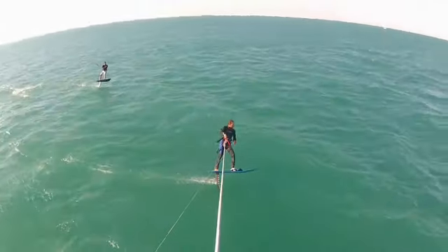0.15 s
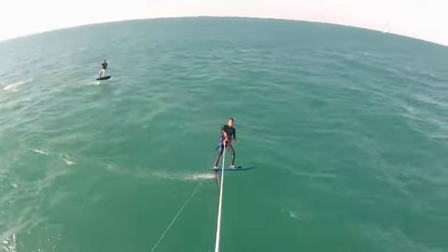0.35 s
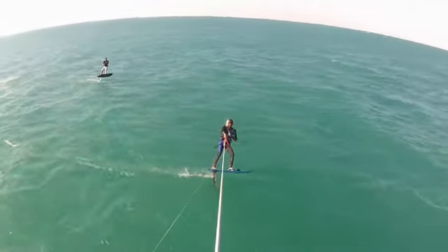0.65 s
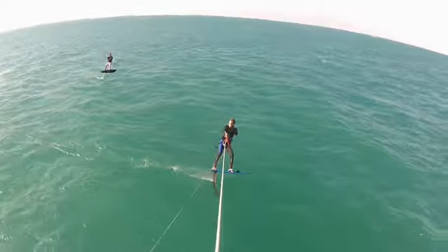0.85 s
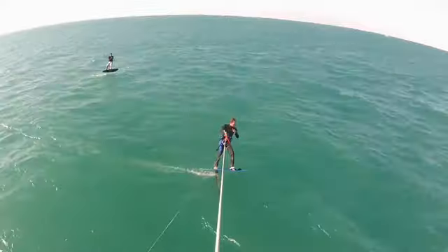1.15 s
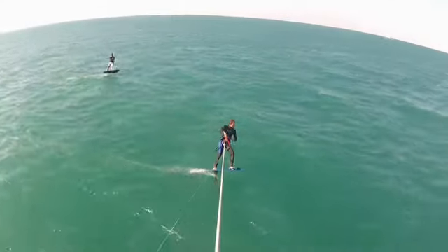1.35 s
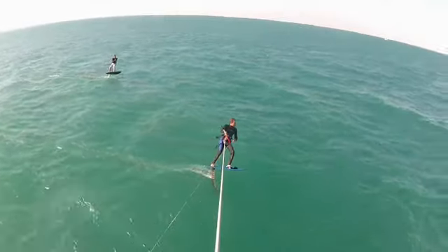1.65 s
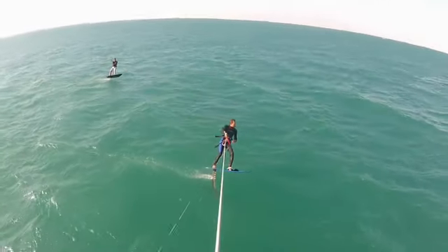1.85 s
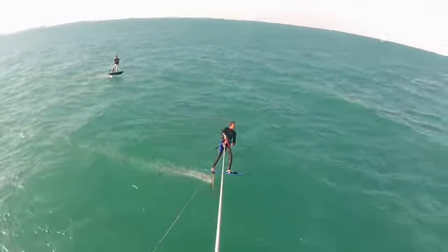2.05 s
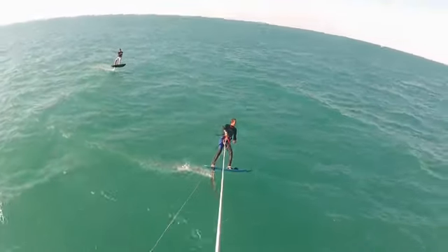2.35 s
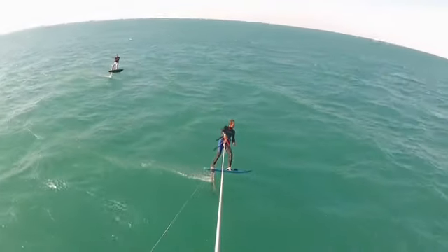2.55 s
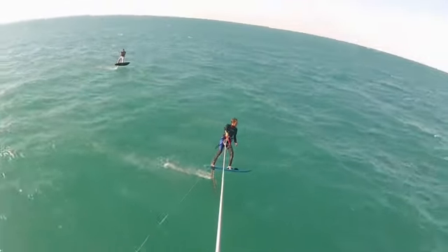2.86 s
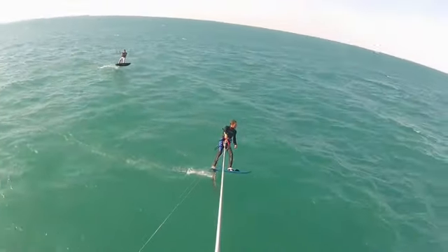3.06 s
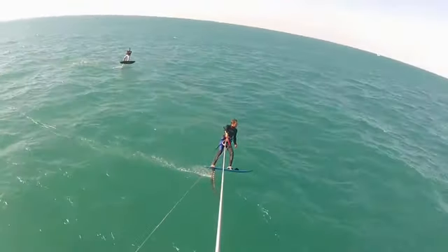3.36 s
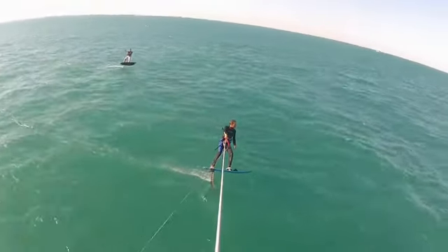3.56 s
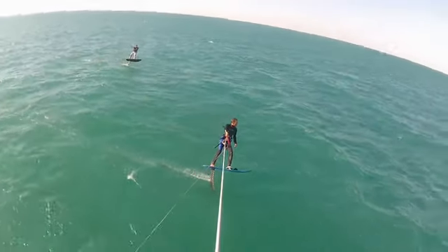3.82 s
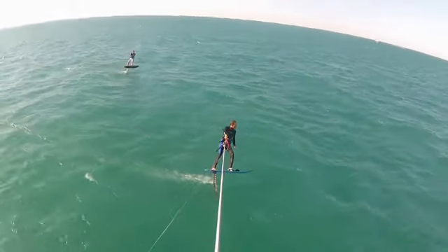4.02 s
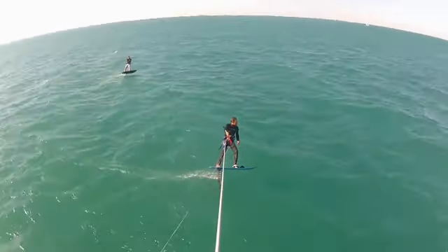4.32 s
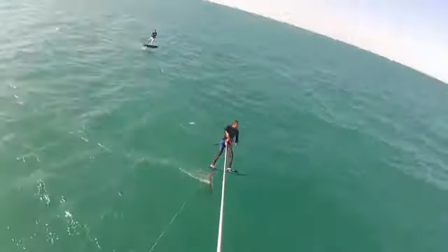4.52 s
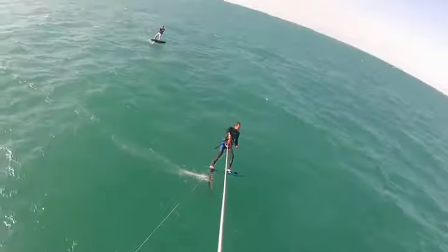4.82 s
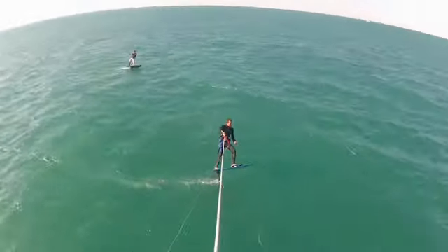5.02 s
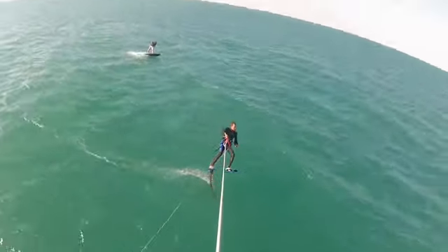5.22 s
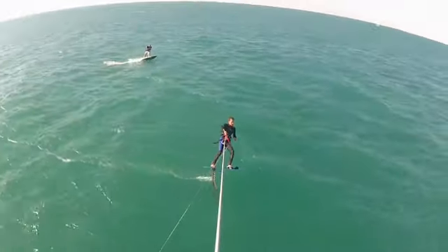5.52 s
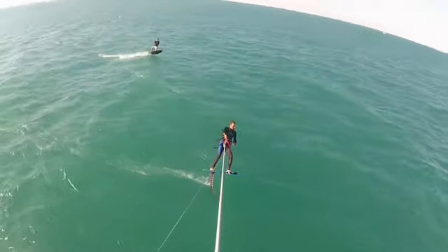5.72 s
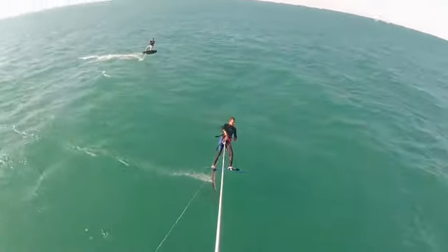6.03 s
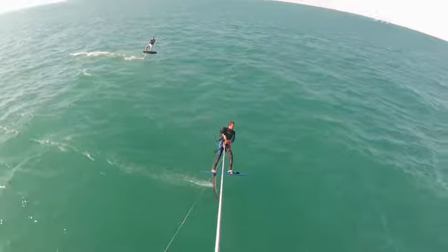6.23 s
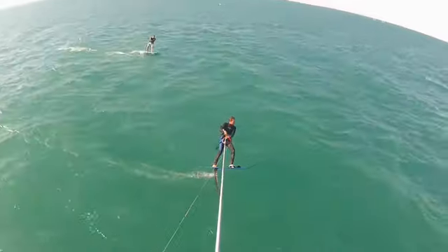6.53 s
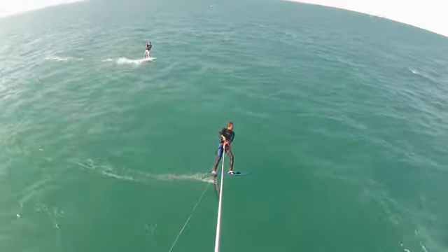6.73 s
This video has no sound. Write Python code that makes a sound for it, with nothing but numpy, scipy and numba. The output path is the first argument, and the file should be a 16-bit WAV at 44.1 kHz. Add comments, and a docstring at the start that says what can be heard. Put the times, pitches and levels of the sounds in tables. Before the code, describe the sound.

Close on a small housed camera hanging from kite lines over open sea, a loud, breathy whistle near 1.4 kilohertz wavers throughout with abrupt swells. Two knocks come early over a short gust, then lighter wind and faint taps. Near 4.5 seconds air rushes, wind thuds low, and the housing cracks hard on its mount; the whistle then continues with more knocks. Gritty, low-rate sound, one channel.

```python
"""A small camera in a closed housing hangs on taut kite lines over open sea.
From the start, vortices shed by two lines whistle with sharp swells, over an opening gust and two early knocks.
The whistle keeps wavering over lighter wind and knocks; near 4.5 s the camera swings: the lower line falls
silent, air rushes past an edge, wind thuds on the port, and the housing knocks hardest on its mount.
From 5.2 s the lower line sounds again. A recorder holding samples at a low rate adds mirror tones throughout."""
import sys
import numpy as np
from scipy import signal
from scipy.io import wavfile
from numba import njit

SR = 44100
rng = np.random.default_rng(int(sys.argv[2]) if len(sys.argv) > 2 else 0)


def dump(signal):
    """Clip the signal to [-1, 1] and save it as 16-bit WAV at the path in sys.argv[1]."""
    limited = np.clip(np.atleast_2d(signal).T, -1, 1)
    pcm = np.round(limited * 32767).astype(np.int16)
    wavfile.write(sys.argv[1], SR, pcm)


N = 303408

# Upper line, a wavering noisy whistle, now narrow, now broad: t/s, f/Hz, level/dB, width/Hz
UPPER_LINE = [(0.0, 1422, -8.5, 100.7), (0.2, 1514, -12.5, 130.5), (0.34, 1423, -12.5, 192.5),
              (0.55, 1435, -11.5, 160.3), (0.68, 1485, -13.5, 96.8), (0.78, 1540, -9.5, 78.4),
              (0.96, 1424, -12, 81.56), (1.12, 1355, -19, 142.3), (1.19, 1384, -11, 205),
              (1.28, 1447, -11, 200), (1.36, 1551, -20, 150.6), (1.46, 1395, -12, 115.6),
              (1.62, 1389, -10.5, 103), (1.78, 1356, -10.5, 61.53), (1.88, 1320, -14, 85),
              (2.0, 1342, -10.5, 120.4), (2.38, 1393, -10.5, 89.4), (2.5, 1481, -11, 137.9),
              (2.72, 1539, -11, 81.8), (2.87, 1353, -12, 94.7), (3.12, 1412, -12, 200.6),
              (3.24, 1514, -13.5, 196.2), (3.42, 1549, -13, 150.5), (3.78, 1487, -10, 109.5),
              (3.91, 1508, -15, 133), (4.0, 1461, -10, 130.4), (4.25, 1366, -11.5, 129.1),
              (4.34, 1313, -20.5, 111.3), (4.45, 1353, -18.5, 152.9), (4.57, 1495, -11, 221.2),
              (4.76, 1522, -14.5, 311.4), (4.85, 1409, -22.5, 209), (5.0, 1333, -12.5, 154.1),
              (5.16, 1515, -9.5, 208.3), (5.29, 1480, -14.5, 159.5), (5.52, 1360, -11.5, 108.6),
              (5.66, 1372, -12.5, 104.4), (5.84, 1320, -12, 80.55), (5.95, 1294, -12, 114.3),
              (6.3, 1354, -9, 90.9), (6.55, 1375, -12.5, 109.5), (6.8, 1458, -9.5, 113.6),
              (6.88, 1384, -9, 111)]
# Lower line in two spells: t/s, pitch/share of the upper line's, octave level/dB, fundamental level/dB
LOWER_LINE = [
    [(0.0, 1, -31, -23), (0.25, 1, -41, -25.5), (0.55, 1.02, -33, -28), (0.78, .965, -45.5, -33),
     (1.0, 1, -38.5, -40), (1.25, 1.02, -32, -20), (1.38, .965, -41.5, -23), (1.5, .99, -37.5, -24),
     (1.63, 1.015, -39.5, -22), (1.75, 1.01, -37, -35), (1.9, 1, -33, -39.5), (2.1, 1, -33, -21),
     (2.42, 1.03, -28.5, -29.5), (2.7, .965, -37, -31), (3.0, 1.01, -34.5, -25), (3.3, .96, -33, -28),
     (3.7, .985, -28.5, -34), (4.1, 1, -32, -43), (4.2, .99, -31.5, -21), (4.33, .93, -40, -19.5),
     (4.5, .7, -53, -25.5)],
    [(5.2, .98, -46.5, -31), (5.6, 1, -38, -31.5), (5.9, .98, -36, -30.5), (6.1, .99, -27, -37),
     (6.28, .995, -35.5, -39.5), (6.45, .97, -40, -14), (6.58, 1.01, -30, -40), (6.72, .995, -42, -34),
     (6.81, 1.01, -34, -35.5), (6.88, 1, -60, -30)],
]
# Travel of a wave up the line and back, shorter when the line is tighter: t/s, round trip/ms
LINE_ROUND_TRIP = [(0, 47), (.55, 56.3), (.85, 67), (1.2, 57), (2.05, 61), (2.65, 63), (3, 60.8), (3.6, 55),
                   (4.2, 60.6), (4.7, 60.4), (5.1, 55.5), (5.65, 59.4), (5.95, 70.2), (6.3, 57.8),
                   (6.88, 60.2)]
# Sharp swells of the whistle, often one round trip apart: onset t/s, peak level/dB
WHISTLE_SWELLS = [(0.3402, -1.1), (0.561, -1.5), (0.62, -0.04), (0.676, 0.2), (0.7886, -0.65),
                  (0.9372, -0.7), (1.058, -1), (1.3024, -0.7), (1.361, -0.8), (1.4186, -1.34), (1.541, -1),
                  (1.6036, -0.65), (1.6624, -1), (2.0043, -1), (2.6083, -0.8), (3.2058, 0.2),
                  (3.5082, -3.5), (3.824, -0.9), (3.8824, -1.5), (4.1215, -0.7), (5.242, -2), (5.2987, -2),
                  (5.4738, -0.7), (5.532, -2), (6.7169, -0.15), (6.8253, -3)]
# Knocks of the housing on its mount: contact t/s, drive of highs/dB, drive of lows/dB, rattle t60/s
MOUNT_KNOCKS = [(0.073, -17.5, -19, 0.32), (0.271, -8.5, -13.5, 0.16), (.4085, -33, -28, 0.18),
                (.56, -25.5, -29.5, 0.33), (0.824, -19.5, -26.5, 0.1), (1.8375, -27, -29, 0.14),
                (2.174, -32, -29, 0.12), (2.6524, -26, -26, 0.11), (2.9613, -29, -45, 0.078),
                (3.736, -17.5, -23, 0.075), (4.3171, -23, -41, 0.057), (4.563, -31, -13, 0.046),
                (4.71, -8, -27, 0.082), (4.7637, 9.5, -3.5, 0.024), (4.874, -12.5, -19, 0.089),
                (4.908, -4.5, -6, 0.038), (5.3536, -32, -25.5, 0.16), (5.581, -10, -13, 0.14),
                (5.914, -17, -17, 0.21), (6.0437, -20, -19.5, 0.2), (6.31, -29, -45, 0.057),
                (6.423, -20.5, -21.5, 0.11)]
# Heavy thuds of wind on the port during the swing: centre t/s, f/Hz, peak level/dB
PORT_THUDS = [(4.47, 124.8, -23), (4.545, 122, -16.5), (4.63, 124, -15), (4.736, 50.7, -10),
              (4.925, 62.8, -12.5)]
# Air past an edge as the camera swings: t/s, length/s, start f/Hz, end f/Hz, full level/dB
EDGE_RUSH = [(4.471, 0.35, 1598, 2060, -16), (4.95, 0.22, 1854, 2164, -24.5)]
# Wind: t/s, gust drive on the port/dB, housing flap level/dB, turbulence drive round the housing/dB
WIND_COURSE = [(0.0, -21, -39, -35), (0.04, -36.5, -29, -41), (0.34, -31, -36, -34), (0.8, -48, -52.5, -45),
               (1.21, -38, -34.5, -38), (1.88, -44, -50.5, -45.5), (1.97, -42, -35, -40),
               (2.72, -43.5, -53.5, -44), (3.16, -33, -42, -37), (3.24, -41, -38.5, -41),
               (3.75, -40.5, -51, -41), (3.81, -43, -38, -40), (4.1, -39.5, -37.5, -41.5),
               (4.18, -41.5, -54, -45.5), (4.39, -31, -34, -38), (4.46, -27, -36, -35),
               (4.52, -23, -19, -27.5), (4.62, -19.5, -19.5, -26), (4.73, -18.5, -27, -23),
               (4.77, -27, -10.5, -19), (4.83, -34.5, -42, -36), (4.94, -20, -27, -26.5),
               (5.08, -25.5, -25.5, -25), (5.34, -35.5, -40, -38.5), (5.38, -34.5, -33.5, -35),
               (5.88, -36, -32.5, -37.5), (5.98, -27.5, -25, -30.5), (6.15, -31.5, -34, -35),
               (6.49, -43, -38.5, -42), (6.88, -42.5, -47.5, -39.5)]
# Housing modes: f/Hz, width/Hz, relative level/dB
HOUSING_MODES = [(519.7, 65, -3.5), (708, 63, -3.5), (861, 106, 0), (1019.5, 98, 0.5), (1470, 126, -0.5),
                 (1777, 282, 1.5), (1981, 267, 1.5), (2248, 97, -3), (2700, 420, -15), (3760, 240, -22.5),
                 (5000, 300, -47)]
# Shell resonances: f/Hz, width/Hz, relative level/dB
SHELL_MODES = [(206, 29, 4), (318, 170, -16.5)]
# Low port resonances: f/Hz, width/Hz, relative level/dB
PORT_MODES = [(52, 24, -1), (95, 43, -2), (142, 20, -1)]

DRAG_WIDTH_HZ, OCTAVE_WIDTH_HZ, THIRD_WIDTH_HZ = 90, 150, 130
ECHO_SHARE = .76   # strength of each return
WAVER, JITTER = .0055, .004   # rms shares by which slow and quick eddies shake the pitch
DRAG_FLICKER_DB = 3   # rms patchiness of the octave tone
THIRD_DB = -52.5   # mean level of the third harmonic against the whistle
BAND_LIMIT = 2.3   # amplitude ceiling, in rms of one quadrature
SWELL_PEAK_S = .00432   # from onset to peak
SWELL_HALF_S, LULL_HALF_S = .00414, .00864   # from centre to 1/e
THUD_CYCLES = 1.6   # from centre to 1/e
RUSH_WIDTH_HZ = 630
RUSH_EDGE = .3   # share of the length spent swelling, and again fading
BUFFET_HZ, BUFFET_WIDTH_HZ = 29.6, 10
REFERENCE_WIND_DB = -40
# Wind layers: level at the reference wind in dB, dB of level per dB of wind
THUMP_DB, RUMBLE_DB = (-43, 1.0655), (-41.5, .9152)
LOW_HISS_DB, HIGH_HISS_DB = (-37, 1.09), (-38.5, .9164)
PATCHY_DB, PATCH_RATE_HZ = 1.24, 6
CUTOFF_HZ = 15590


def lines():
    """Vortices shed by two lines make noisy tones; echoes along the lines roughen the fundamentals and octave."""
    steady_hz, level_db, width_hz = in_time(UPPER_LINE)
    (share, octave_db, low_db), gate = spells(LOWER_LINE)
    hz = steady_hz * (1 + WAVER * drift(7.02) + JITTER * drift(22))
    # The octave flutters on eddies of its own, on top of the upper line's
    octave_hz = 2 * share * hz * (1 + WAVER * drift(9) + JITTER * drift(22))

    upper = from_db(level_db) * narrow_noise(hz, width_hz, ECHO_SHARE)
    lower = from_db(low_db) * narrow_noise(octave_hz / 2, DRAG_WIDTH_HZ, ECHO_SHARE)
    octave_level = from_db(octave_db + DRAG_FLICKER_DB * drift(6.8))
    octave = octave_level * narrow_noise(octave_hz, OCTAVE_WIDTH_HZ, ECHO_SHARE)
    third_level = from_db(level_db + THIRD_DB + 2.5 * drift(6) + 4 * drift(30))
    third = third_level * narrow_noise(3 * hz, THIRD_WIDTH_HZ)

    bursts, lull = swells(hz)
    return lull * (upper + gate * lower) + bursts + gate * (octave + third)


def swells(hz):
    """Short bell-shaped tone bursts at the whistle's pitch, and the lull cut round each in the steady tone."""
    t = np.arange(N) / SR
    envelope, lull = np.zeros(N), np.ones(N)
    for onset, peak_db in WHISTLE_SWELLS:
        since_peak = t - onset - SWELL_PEAK_S
        envelope += from_db(peak_db) * np.exp(-(since_peak / SWELL_HALF_S) ** 2)
        lull *= 1 - .95 * np.exp(-(since_peak / LULL_HALF_S) ** 2)
    return envelope * np.sin(2 * np.pi * np.cumsum(hz) / SR), lull


def knocks(clicks_per_s=900, attack_s=.0018):
    """Each knock is a rattle of clicks on the housing modes; high modes speak first, low ones just after."""
    t = np.arange(round(.2 * SR)) / SR
    highs, lows = np.zeros((2, N + len(t) + 500))
    for s, high_db, low_db, t60 in MOUNT_KNOCKS:
        rattle = rng.standard_normal(len(t)) * (rng.random(len(t)) < clicks_per_s / SR)
        rattle[round(.002 * SR)] = 1.1   # the first firm contact
        rattle *= (1 - np.exp(-t / attack_s)) * from_db(-60 * t / t60)
        at = round((s - .002) * SR)
        later = round((s + .0011) * SR)
        highs[at:at + len(t)] += from_db(high_db) * rattle
        lows[later:later + len(t)] += from_db(low_db) * rattle

    struck = np.zeros(N)
    for clicks, modes in (highs, HOUSING_MODES[5:]), (lows, HOUSING_MODES[:4]):
        click_peak = resonances(signal.unit_impulse(N), modes).max()
        struck += resonances(clicks[:N], modes) / click_peak   # a unit click rings to 1
    return signal.sosfilt(signal.butter(2, 3000, fs=SR, output="sos"), struck)


def thuds():
    """Each thud is a few cycles of low pressure on the port that swell and fade."""
    t = np.arange(N) / SR
    out = np.zeros(N)
    for s, hz, peak_db in PORT_THUDS:
        cycles = hz * (t - s)
        bell = np.exp(-(cycles / THUD_CYCLES) ** 2)
        out += from_db(peak_db) * bell * np.sin(2 * np.pi * (cycles + rng.random()))
    return out


def rush():
    """Air past an edge is a broad noise band that climbs in pitch while it swells and fades."""
    t = np.arange(N) / SR
    out = np.zeros(N)
    for s, length, from_hz, to_hz, full_db in EDGE_RUSH:
        done = np.clip((t - s) / length, 0, 1)
        shape = np.clip(np.minimum(done, 1 - done) / RUSH_EDGE, 0, 1)
        air = narrow_noise(from_hz + (to_hz - from_hz) * done, RUSH_WIDTH_HZ)
        out += shape * from_db(full_db + 1.3 * drift(27)) * air
    return out


def wind():
    """Gusts drive lumpy noise through port and shell, turbulence hisses through the housing, which flaps."""
    gust_db, buffet_db, turbulence_db = in_time(WIND_COURSE)
    lumpy, gusty = from_db(2.1 * drift(25)), from_db(2.4 * drift(53))
    out = from_db(buffet_db) * narrow_noise(np.full(N, BUFFET_HZ), BUFFET_WIDTH_HZ)
    layers = [
        (gust_db, THUMP_DB, lumpy, PORT_MODES),
        (gust_db, RUMBLE_DB, lumpy, SHELL_MODES),
        (turbulence_db, LOW_HISS_DB, gusty, HOUSING_MODES[:5]),
        (turbulence_db, HIGH_HISS_DB, gusty, HOUSING_MODES[5:]),
    ]
    for drive_db, (db, share), flutter, modes in layers:
        level_db = db + share * (drive_db - REFERENCE_WIND_DB) + PATCHY_DB * drift(PATCH_RATE_HZ)
        out += from_db(level_db) * rms_one(resonances(rng.standard_normal(N) * flutter, modes))
    return out


def narrow_noise(hz, width_hz, echo_share=0.):
    """A steep noise band of moving centre and width: a gliding tone whose wander may echo on the line."""
    white = rng.standard_normal((2, 2 ** 17))
    wander = signal.sosfilt(signal.butter(4, 1 / 16, output="sos"), white)[:, 500:]
    # Reading the wander faster makes the band wider
    at = np.cumsum(width_hz * np.ones(N)) * 16 / SR
    lag = in_time(LINE_ROUND_TRIP)[0] * SR / 1000
    cosine, sine = (echoes(np.interp(at, np.arange(len(w)), w), lag, echo_share) for w in wander)
    size = np.hypot(cosine, sine) / (BAND_LIMIT * cosine.std())
    phase = 2 * np.pi * np.cumsum(hz) / SR
    tone = cosine * np.cos(phase) + sine * np.sin(phase)
    return rms_one(tone / (1 + size ** 4) ** (1 / 4))   # soft ceiling on the amplitude


@njit
def echoes(x, lag, share):
    """Each wave comes back weaker after one round trip, given in samples, and again after the next."""
    out = x.copy()
    for i in range(len(x)):
        at = i - lag[i]
        k = int(at)
        if at >= 0:
            out[i] += share * (out[k] + (at - k) * (out[k + 1] - out[k]))
    return out


def resonances(x, modes):
    """Parallel two-pole resonances of alternating sign."""
    out = np.zeros(N)
    for k, (hz, width_hz, db) in enumerate(modes):
        r = np.exp(-np.pi * width_hz / SR)
        top = (-1) ** k * from_db(db) * (1 - r * r) / 2
        poles = [1, -2 * r * np.cos(2 * np.pi * hz / SR), r * r]
        out += signal.lfilter([top, 0, -top], poles, x + 1e-18)
    return out


def drift(rate_hz):
    """Slow random wander of rms 1: noise through two equal low-pass poles, drawn every 40 samples."""
    r = np.exp(-80 * np.pi * rate_hz / SR)
    slow = signal.lfilter([1], [1, -2 * r, r * r], rng.standard_normal(N // 40 + 2002))[2000:]
    return np.interp(np.arange(N) / 40, np.arange(len(slow)), rms_one(slow))


def spells(tables):
    """Joined curves of several spells, and a gate that fades over 68 ms outside each."""
    t = np.arange(N) / SR
    gate = np.zeros(N)
    for rows in tables:
        outside = np.maximum(rows[0][0] - t, t - rows[-1][0])
        gate += np.clip(1 - outside / .068, 0, 1)
    return in_time(np.concatenate(tables)), gate


def in_time(rows):
    """Columns of a table as curves, sample by sample."""
    s, *columns = np.transpose(rows)
    return [np.interp(np.arange(N) / SR, s, c) for c in columns]


def rms_one(x):
    """Signal scaled to rms 1."""
    return x / np.sqrt(np.mean(np.abs(x) ** 2) + 1e-20)


def from_db(db):
    """Gain of a level in dB."""
    return 10 ** (np.asarray(db) / 20)


def scene():
    """Everything that reaches the microphone, as one channel."""
    return (lines() + knocks() + thuds() + rush() + wind())[None]


def record(dry):
    """Low-pass, hard overload, samples held for four steps (mirror tones round the low rate), steep top cut."""
    dull = signal.sosfilt(signal.butter(8, 5400, fs=SR, output="sos"), dry)
    sampled = signal.resample_poly(dull, 40, 147, axis=1)   # 12000 samples a second
    overloaded = np.clip(sampled, -.95, .95)
    held = signal.resample_poly(np.repeat(overloaded, 4, axis=1), 147, 160, axis=1)   # back to SR
    held = np.pad(held, ((0, 0), (0, 8)))[:, :N]
    return signal.sosfilt(signal.ellip(10, .3, 80, CUTOFF_HZ, fs=SR, output="sos"), held)


dry = scene()
out = record(dry)
dump(out)
```